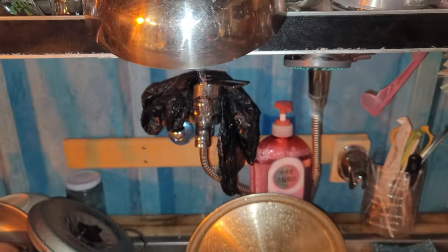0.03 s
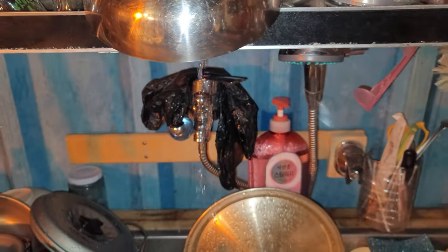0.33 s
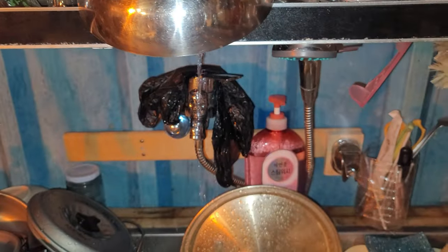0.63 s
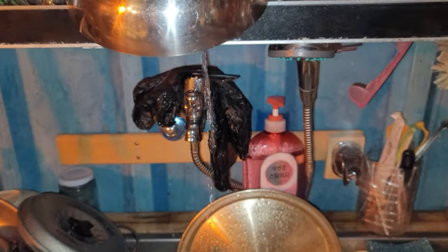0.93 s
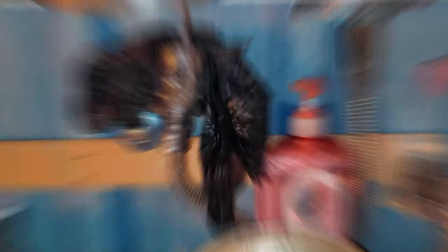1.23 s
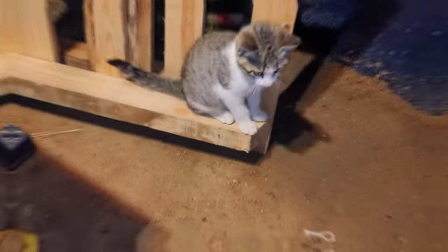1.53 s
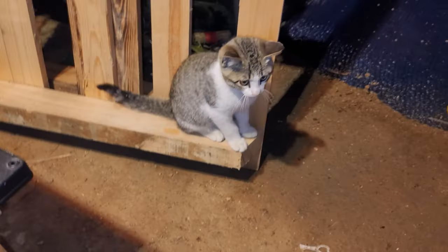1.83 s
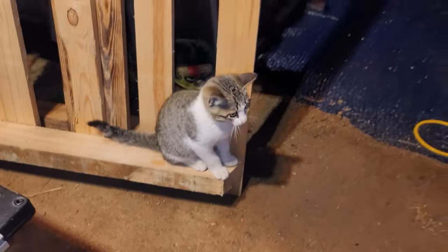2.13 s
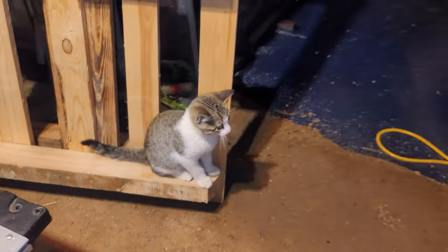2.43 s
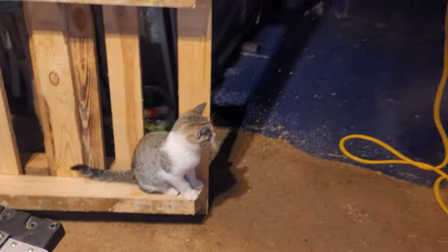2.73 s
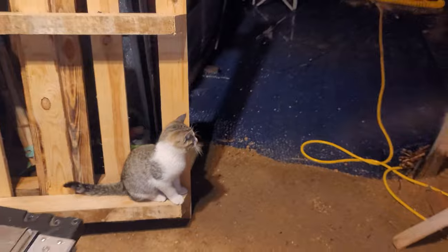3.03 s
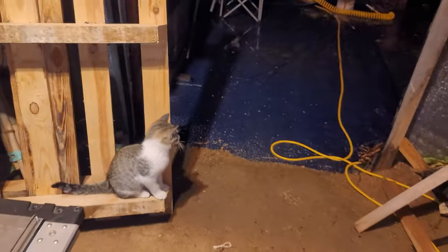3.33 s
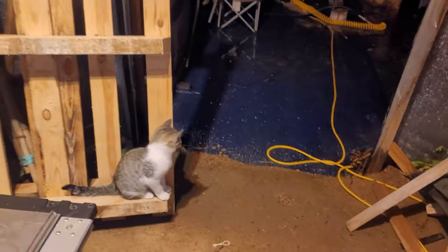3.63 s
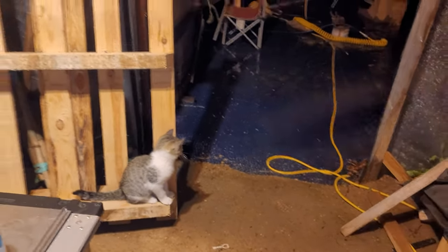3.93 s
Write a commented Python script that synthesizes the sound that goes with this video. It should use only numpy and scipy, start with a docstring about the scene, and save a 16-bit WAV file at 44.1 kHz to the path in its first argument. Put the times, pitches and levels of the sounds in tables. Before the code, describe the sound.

Rain pounds a roof over faint tap spatters, cuts out, and resumes softer with drips.

```python
"""Under a roof in heavy rain, in two scenes parted by a short silence.
First at a kitchen sink: countless impacts on the roof merge into a full roar, while a thin stream
of tap water spatters close by. Then at the open edge of the shelter: lighter rain, fat drips
smacking the ground, a few soft thuds and a faint hum. Each splash is a dying spray of tiny
impacts, followed by its reflections from roof and walls."""
import sys
import numpy as np
from scipy import signal
from scipy.fft import rfft, irfft
from scipy.io import wavfile
from scipy.ndimage import uniform_filter1d

SR = 44100
rng = np.random.default_rng(int(sys.argv[2]) if len(sys.argv) > 2 else 0)


def inscribe(sig):
    """Save sig as 16-bit PCM at rate SR to the path in sys.argv[1].

    A 1-D sig is mono; a 2-D sig holds one channel per row.
    Samples are clipped to [-1, 1] before scaling.
    """
    pcm = np.round(np.clip(np.atleast_2d(sig).T, -1, 1) * 32767)
    wavfile.write(sys.argv[1], SR, pcm.astype(np.int16))


N = 176400
T = np.arange(N) / SR


def rain(roar, width, lead, level, drops, drop_share, patch_db, flutter_db):
    """Incoherent sources add in power: near drops and a wash of far ones merge into one roar."""
    frames = dict(nperseg=2048, noverlap=1536)
    hz, t, wash = signal.stft(rng.standard_normal((2, N)), SR, **frames)
    near = signal.stft(drops, SR, **frames)[2]
    share = curve(drop_share, hz)[:, None]  # rows of frequency_hz, power_share
    mid, side = np.sqrt(1 - share) * wash + np.sqrt(share) * near
    # Side in quadrature with mid puts the left ear ahead in phase.
    ahead = curve(lead, hz)[:, None]
    side = (1j * ahead * mid + np.sqrt(1 - ahead ** 2) * side) * amp(curve(width, hz))[:, None]
    # The level drifts in patches of frequency and time, and flutters as a whole.
    patches = uniform_filter1d(rng.standard_normal(mid.shape), size=45, axis=0)
    patches = unit(uniform_filter1d(patches, size=6, axis=1))
    flutter = unit(uniform_filter1d(rng.standard_normal(len(t)), size=7))
    times, body_db, treble_db = np.transpose(level)
    body_hz, treble_hz = 1190, 4940
    high = curve([(body_hz, 0), (treble_hz, 1)], hz)[:, None]
    db = (1 - high) * np.interp(t, times, body_db) + high * np.interp(t, times, treble_db)
    db += patch_db * patches + flutter_db * flutter
    colour = unit(amp(curve(roar, hz)))[:, None]
    ears = np.array([mid + side, mid - side]) * colour * amp(db)
    return signal.istft(ears, **frames)[1][:, :N]


def patter(per_s, spread_db, splat_s, echo_s, echo_db):
    """Shot noise, as mid and side: random drops, mostly small, each a splat with a decaying echo."""
    out, pitches = np.zeros((2, N)), np.geomspace(400, 14000, 6)
    t = T[:SR // 4]
    splat = np.exp(-2 * t / splat_s) / splat_s
    echo = amp(echo_db) ** 2 * np.exp(-2 * t / echo_s) / echo_s
    for hz in pitches:
        size = amp(spread_db * np.minimum(rng.exponential(1, N), 4))
        lands = rng.random(N) < per_s / len(pitches) / SR
        power = abs(signal.oaconvolve((size * lands) ** 2, splat + echo)[:N])
        bursts = np.sqrt(power) * rng.standard_normal((2, N))
        out += np.sqrt(hz) * band(bursts, hz, octaves=.9)
    return unit(out)


def rain_at_sink():
    """Dense impacts on the roof overhead superpose into a full roar."""
    # Spectrum of the rain's roar as heard at the sink: frequency_hz, relative_db
    roar = [(15, -53), (25, -20.5), (49, -6.5), (91, -3), (148, -7), (349, -2.5), (469, -4.5), (552, -2.5),
            (598, -5.5), (666, 0), (919, -6.5), (1660, -6), (2490, -12), (3170, -13.5), (5280, -20),
            (6050, -20), (9810, -31), (12500, -25), (15500, -28.5)]
    # Stereo width: frequency_hz, side_minus_mid_db
    width = [(40, -17), (130, -12.5), (240, -11.5), (400, -.5), (700, 3), (1000, 7), (1400, 7), (2000, .5),
             (6000, 0), (15000, -1)]
    # Phase lead of the left ear: frequency_hz, quadrature_share
    lead = [(100, 0.2), (650, 0.25), (1400, 0.04)]
    # Strength of the rain: time_s, body_db, treble_db
    level = [(0, -26, -27), (.5, -26.5, -28), (.85, -25, -29), (1.05, -26.5, -27.5), (1.25, -27, -28.5)]
    drops = patter(per_s=2500, spread_db=5, splat_s=.00092, echo_s=.013, echo_db=4)
    return rain(roar, width, lead, level, drops, drop_share=[(300, .34), (2000, .3), (10000, .35)],
                patch_db=.88, flutter_db=.63)


def rain_at_edge():
    """Sparser impacts superpose into lighter rain, with more of the treble power in single drops."""
    # Spectrum of the rain's roar as heard at the edge: frequency_hz, relative_db
    roar = [(15, -41), (25, -26), (59, -6), (133, -7), (173, -8), (209, -4), (305, -3.5), (368, -5),
            (469, 0), (567, -1), (614, 0.5), (804, -0.5), (895, -4), (1380, -0.5), (1490, -2.5), (2010, -5),
            (2170, -6.5), (3000, -6.5), (4380, -13), (6210, -11.5), (7910, -20), (10600, -18),
            (15500, -20.5)]
    # Stereo width: frequency_hz, side_minus_mid_db
    width = [(40, -9), (130, -10.5), (240, -9.5), (370, -2.5), (700, 0), (1100, 2.5), (1500, 5.5),
             (2100, 0.5), (3200, 0.5), (6500, 0.3), (10000, -7), (15000, -5.5)]
    # Phase lead of the left ear: frequency_hz, quadrature_share
    lead = [(100, 0.084), (400, 0.12), (900, 0)]
    # Strength of the rain: time_s, body_db, treble_db
    level = [(1.36, -32.5, -33.5), (1.8, -34, -32.5), (2.25, -33, -34), (2.7, -35, -34), (3.15, -35.5, -34),
             (3.55, -35, -37), (4, -33.5, -36)]
    drops = patter(per_s=1900, spread_db=3.5, splat_s=.001, echo_s=.021, echo_db=3)
    return rain(roar, width, lead, level, drops, drop_share=[(600, .33), (3000, .55), (10000, .41)],
                patch_db=1.06, flutter_db=.1)


def splashes(rows, correlation, rise_s, grain_db=2):
    """Impact noise: each drop bursts into a spray of tiny impacts that decays exponentially."""
    out, t = np.zeros((2, N)), T[:8192]
    for start_s, level_db, centre_hz, octaves, decay_s in rows:
        left, right, both, grain = rng.standard_normal((4, len(t)))
        spray = np.sqrt(1 - correlation) * np.array([left, right]) + np.sqrt(correlation) * both
        spray *= unit(amp(grain_db * unit(uniform_filter1d(grain, size=16))))
        envelope = np.minimum(t / rise_s, 1) * np.exp(-t / decay_s)
        add(out, start_s, amp(level_db) * band(spray * envelope, centre_hz, octaves))
    return out


def tap_water():
    """A thin stream spatters close by: brief, bright impacts whose direct sound outweighs the echo."""
    # Spatters in the sink: start_s, level_db, centre_hz, width_octaves, decay_s
    spatters = [(.057, -22, 3000, .15, 0.0033), (.1565, -34, 7000, 1, .003),
                (.1895, -30.5, 12000, .4, .004), (.2653, -29.5, 13000, .45, 0.0043),
                (.2838, -28, 5200, .4, .005), (.335, -34, 13000, .35, .004),
                (.4145, -21.5, 4800, .35, 0.0048), (.4155, -27, 11000, 0.89, 0.0039),
                (.711, -31, 11000, .7, .005), (.815, -28.5, 6300, 0.26, 0.0026),
                (.918, -40.5, 14500, .2, 0.0055), (.9443, -24, 3480, .25, 0.0028),
                (1.05, -38, 12500, .2, .006), (1.076, -23.5, 13500, .4, 0.0076),
                (1.2185, -23, 5000, 0.43, 0.0028)]
    return shelter(splashes(spatters, correlation=.44, rise_s=.0006), t60_s=.11, wet_db=-8)


def eaves_drips():
    """Fat drips fall from the eaves; each impact on the ground radiates a smack."""
    # Drips on the ground: start_s, level_db, centre_hz, width_octaves, decay_s
    drips = [(1.55, -31.5, 1870, 0.31, 0.015), (1.808, -31.5, 2870, .3, 0.019),
             (1.8922, -25.5, 4300, 0.46, 0.017), (1.984, -42, 6160, 0.16, 0.016),
             (2.0319, -26.5, 1880, .35, 0.018), (2.072, -28, 2300, .5, 0.013),
             (2.0913, -22.5, 1330, 0.91, 0.0094), (2.108, -34, 4030, .6, 0.023),
             (2.322, -33, 3300, .4, .025), (2.4195, -33, 2300, 0.59, 0.021),
             (2.512, -32, 5500, 0.63, 0.0074), (2.6146, -35, 1600, .8, 0.0026),
             (2.8336, -26.5, 3600, 0.38, 0.013), (2.836, -32, 5800, 0.2, 0.034),
             (2.9294, -26, 1900, 0.87, 0.029), (3.0326, -30.5, 2820, 0.41, 0.016),
             (3.052, -33, 2970, 0.53, .02), (3.326, -26, 1850, .25, 0.017), (3.424, -36, 4200, 0.71, 0.008),
             (3.547, -33.5, 6000, 0.44, .008), (3.715, -31, 4430, 0.65, 0.0087)]
    return shelter(splashes(drips, correlation=.13, rise_s=.0019), t60_s=.14, wet_db=-4)


def thuds(rise_s=.035):
    """Damped oscillations: deep bumps swell and die within a few cycles."""
    # Soft thuds: start_s, level_db, pitch_hz
    bumps = [(1.47, -46, 42), (2.075, -34.5, 64), (2.185, -37, 59)]
    out, t = np.zeros((2, N)), T[:SR // 2]
    swell = (t / rise_s * np.exp(1 - t / rise_s)) ** 2
    for start_s, level_db, pitch_hz in bumps:
        add(out, start_s, amp(level_db) * (swell * np.sin(2 * np.pi * pitch_hz * t))[None])
    # A hollow knock opens the strongest thud.
    knock_s, knock_db, knock_hz, decay_s = 2.066, -37, 180, .018
    knock = np.exp(-t / decay_s) * np.sin(2 * np.pi * knock_hz * t)
    add(out, knock_s, amp(knock_db) * knock[None])
    return out


def low_hum():
    """Narrow-band noise wavers by itself: a faint hum, and the roof's low drone."""
    hum, drone = rng.standard_normal((2, N))
    return amp(-62) * band(hum, hz=61.4, octaves=.12) + amp(-54.5) * band(drone, hz=183.6, octaves=.17)


def shelter(x, t60_s, wet_db):
    """Reverberation: diffuse reflections from roof and walls reach each ear differently."""
    t = T[:SR // 2]
    reflections = rng.standard_normal((2, len(t))) * (rng.random((2, len(t))) < .1) * (t > .004)
    tail = reflections * np.exp(-np.log(1000) * t / t60_s)
    return x + amp(wet_db) * signal.fftconvolve(x, tail / np.linalg.norm(tail[0]), axes=1)[:, :N]


def band(x, hz, octaves):
    """A bell-shaped band-pass around hz that conserves the power of white noise."""
    f = np.fft.rfftfreq(x.shape[-1], 1 / SR)
    bell = 1 / (1 + (np.log2((f + 1) / hz) / octaves) ** 2 / 2) ** 2
    return irfft(rfft(x) * unit(bell), x.shape[-1])


def amp(db):
    """Decibels as an amplitude ratio."""
    return 10 ** (np.asarray(db) / 20)


def unit(x):
    """Normalisation to rms 1."""
    return x / np.sqrt(np.mean(x ** 2) + 1e-20)


def curve(points, hz):
    """Interpolation on a log-frequency axis."""
    f, value = np.transpose(points)
    return np.interp(np.log(hz + 1), np.log(f), value)


def add(mix, start_s, sound):
    """Superposition: a sound joins the mix at start_s."""
    part = mix[:, round(start_s * SR):][:, :sound.shape[1]]
    part += sound[:, :part.shape[1]]


def scene():
    """The sources sum at each place: first the sink, then, after a silence, the shelter's edge."""
    sink_end_s, edge_start_s, fade_s = 1.254, 1.364, .002
    sink = rain_at_sink() + tap_water()
    edge = rain_at_edge() + eaves_drips() + thuds() + low_hum()
    fade_out = np.clip((sink_end_s + fade_s - T) / fade_s, 0, 1)
    fade_in = np.clip((T - edge_start_s + fade_s / 2) / fade_s, 0, 1)
    return sink * fade_out + edge * fade_in


def record(dry):
    """Band limiting: a steep low-pass removes the highest treble."""
    cutoff_hz = 15830
    lowpass = signal.firwin(511, cutoff_hz, window=("kaiser", 9), fs=SR)
    return signal.oaconvolve(dry, lowpass[None], "same")


dry = scene()
out = record(dry)
inscribe(out)
```